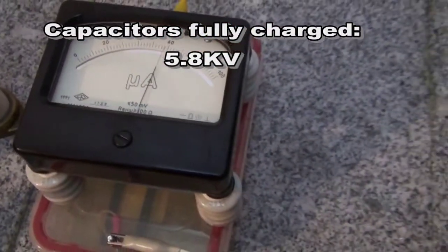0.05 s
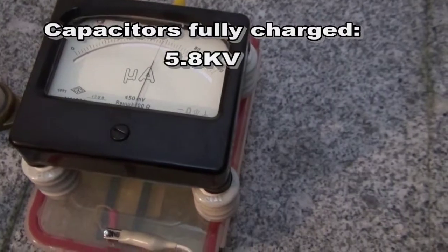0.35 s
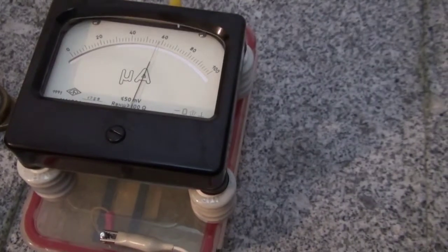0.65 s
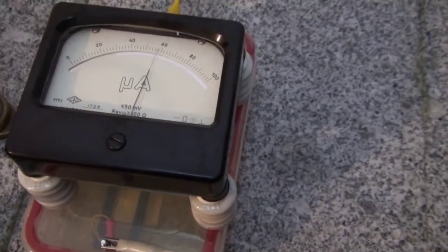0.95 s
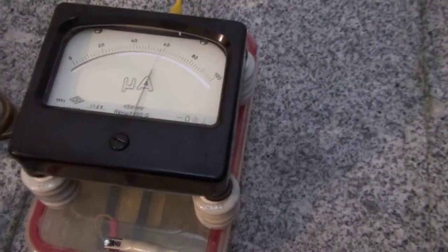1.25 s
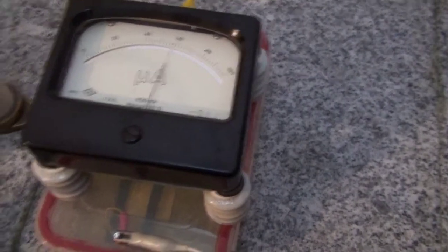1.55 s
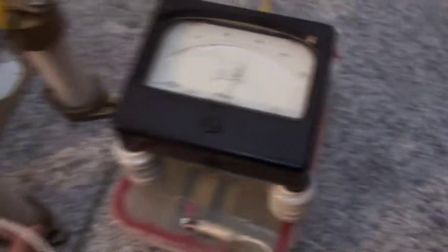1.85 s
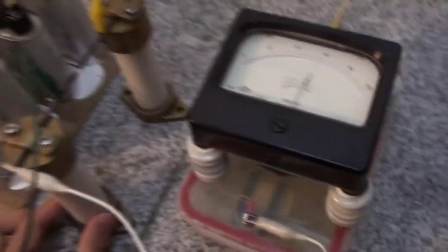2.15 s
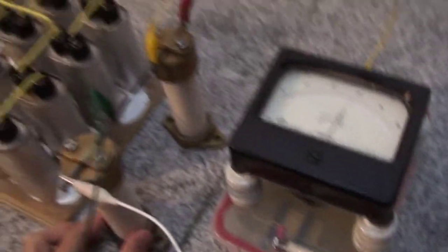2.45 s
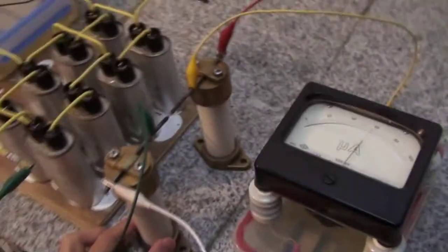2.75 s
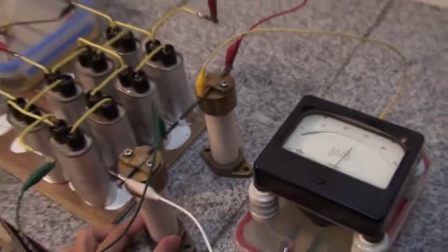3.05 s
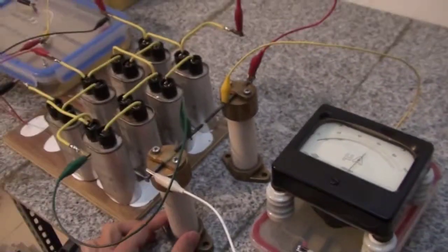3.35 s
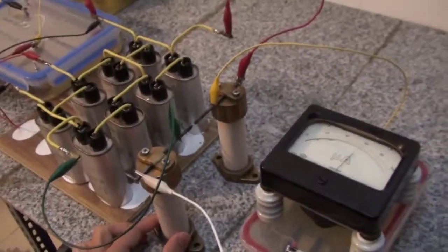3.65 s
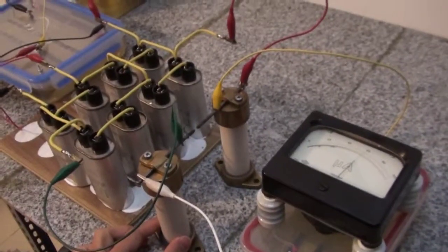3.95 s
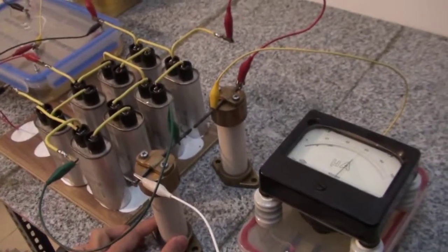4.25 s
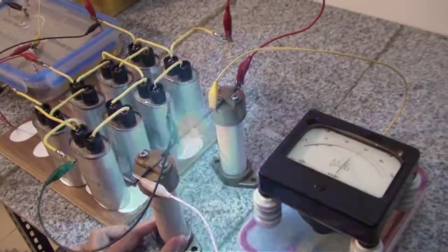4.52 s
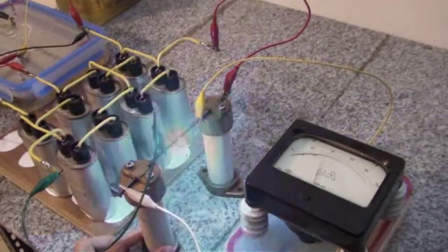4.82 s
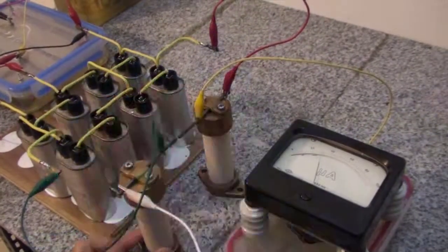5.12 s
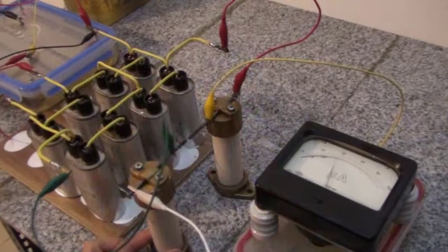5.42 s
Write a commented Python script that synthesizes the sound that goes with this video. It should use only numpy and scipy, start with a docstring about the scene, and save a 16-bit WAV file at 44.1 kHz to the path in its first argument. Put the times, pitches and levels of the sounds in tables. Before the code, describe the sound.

Faint room hiss and hum, then a rapid run of loud electric spark cracks merging into a bright sizzle.

```python
"""Bare, hard-floored room with a charged high-voltage capacitor bank. At first only hiss, rumble, hum
and one small handling tick. From 4.4 s a spark gap breaks down about 12 times a second. Each spark:
a sharp crack with the same floor and wall echoes, a short ring of the apparatus, a bright tail and a
microphone overload thump, heavy after a long pause. Gain control ducks the cracks and recovers into
the tails: an almost unbroken sizzle."""
import sys
import numpy as np
from scipy import signal
from scipy.fft import rfft, irfft
from scipy.io import wavfile
from scipy.ndimage import uniform_filter1d

SR = 44100
rng = np.random.default_rng(int(sys.argv[2]) if len(sys.argv) > 2 else 0)


def transcribe(u):
    """Save the signal u as a 16-bit wav file named by the first command-line argument.

    u: samples, shape (n,) or (channels, n), limited to [-1, 1]; the rate is SR.
    q: integer samples, one column per channel.
    """
    v = np.clip(np.atleast_2d(u).T, -1, 1)
    q = np.round(v * 32767).astype(np.int16)
    wavfile.write(sys.argv[1], SR, q)


N = 246078
TIME_S = np.arange(N) / SR
EVENT_N = SR // 2
EVENT_S = TIME_S[:EVENT_N]

# Room noise spectrum: f/Hz, relative density/dB
HISS_SPECTRUM = [(60, -1), (130, -1), (220, -3.5), (400, -3.5), (700, -6.5), (1200, -7.5), (2000, -12),
                 (4000, -18.5), (8000, -23.5), (13500, -27.5)]
# Room noise stereo image: f/Hz, L-R correlation
HISS_CORRELATION = [(60, .99), (200, 0.86), (400, 0.55), (800, 0.089), (3000, .12), (8000, 0.29),
                    (14000, 0.61)]
# Hum lines: f/Hz, rms level/dB
HUM_LINES = [(52.2, -54.5), (150.7, -76.5), (199.2, -73.5), (301.5, -76), (839.8, -79), (6700, -88.5),
             (8899, -90)]
# Handling tick: t/s, level/dB
TICKS = [(1.7128, -51)]
# Tick spectrum: f/Hz, relative density/dB
TICK_SPECTRUM = [(500, -22), (1900, 4), (4200, -15), (6300, 1), (9000, -16), (13000, -30)]
# Gap breakdowns: t/s, relative level/dB
DISCHARGES = [(4.4273, 4), (4.5245, 1.5), (4.617, 2), (4.7078, 1), (4.804, 1.5), (4.908, 0.5),
              (4.9968, -0.5), (5.0675, 1), (5.1475, -1), (5.272, 1.5), (5.354, -3.5), (5.4609, -2.5),
              (5.5443, 6)]
# Direct path and first reflections: delay/s, relative level/dB
ARRIVALS = [(0.0, -1), (.0025, 2.5), (.0046, -3), (.0067, 4), (0.0095, -7.5), (.0160, -10), (0.0252, -18.5)]
# Crack spectrum: f/Hz, relative density/dB
CRACK_SPECTRUM = [(60, -38), (200, -12.5), (600, 0), (930, -4.5), (1130, -9), (1800, -1), (3500, -5.5),
                  (7500, 2.5), (10300, 6.5), (12700, -3), (15500, -14)]
# Crack stereo image: f/Hz, L-R correlation
CRACK_CORRELATION = [(200, -0.65), (700, -0.4), (2000, 0.049), (6000, 0.88), (15000, 0.78)]
# Reverberation spectrum: f/Hz, relative density/dB
REVERB_SPECTRUM = [(59, -82), (100, -35), (234, -27.5), (608, -23.5), (891, -23), (1360, -15.5),
                   (2170, -13), (2860, -7.5), (3400, -7.5), (6990, 0.5), (10500, -1), (12700, -10),
                   (14700, -5.5), (16000, -10.5)]
# Stereo image of reverberation and tick: f/Hz, L-R correlation
ROOM_CORRELATION = [(200, 1), (3000, 0.88), (8000, 0.79), (15000, 0.35)]


def from_db(db):
    """Decibels to gain."""
    return 10 ** (np.asarray(db) / 20)


def unit_rms(x):
    """Scale to rms 1."""
    return x / np.sqrt(np.mean(x ** 2) + 1e-20)


def at_hz(points, hz):
    """Table lookup on a log-frequency axis."""
    table = np.array(points)
    return np.interp(np.log(np.maximum(hz, 1)), np.log(table[:, 0]), table[:, 1])


def butter(x, edge_hz, kind, order):
    """Causal Butterworth filter."""
    return signal.sosfilt(signal.butter(order, edge_hz, kind, fs=SR, output="sos"), x + 1e-18)


def drift(knots_per_s):
    """Slow wander between unit-variance random knots."""
    knots = rng.standard_normal(256)
    return np.interp(TIME_S * knots_per_s, np.arange(len(knots)), knots)


def stereo_noise(spectrum, correlation, size=EVENT_N):
    """Coloured noise, rms 1, L-R correlation set per frequency."""
    hz = np.arange(size // 2 + 1) * SR / size
    mid, side = rfft(rng.standard_normal((2, size)))
    rho = at_hz(correlation, hz)
    left_right = np.sqrt(1 + rho) * mid + np.sqrt(1 - rho) * side * [[1], [-1]]
    return unit_rms(irfft(left_right * from_db(at_hz(spectrum, hz)), size))


def decay(t60_s, delay_s=0):
    """Step at delay_s, then exponential decay."""
    age_s = EVENT_S - delay_s
    return (age_s >= 0) * from_db(-60 * np.maximum(age_s, 0) / t60_s)


def add(out, start_s, sound):
    """Mix in at start_s."""
    start = round(start_s * SR)
    part = sound[:, :max(N - start, 0)]
    out[:, start:start + part.shape[1]] += part


def hiss(start_db, rise_db_per_s):
    """Room noise, creeping up steadily."""
    gain = from_db(start_db + rise_db_per_s * TIME_S)
    return butter(gain * stereo_noise(HISS_SPECTRUM, HISS_CORRELATION, size=N), 13500, "low", order=12)


def rumble(level_db, wander_db, corner_hz):
    """Low background noise; the level wanders."""
    lows = butter(rng.standard_normal(N), corner_hz, "low", order=1)
    lows = butter(lows, 220, "low", order=2)
    return from_db(level_db + wander_db * drift(knots_per_s=3)) * unit_rms(lows)


def hum(waver_hz, waver_db):
    """Sine lines, each wavering in pitch and level."""
    out = np.zeros(N)
    for hz, rms_db in HUM_LINES:
        phase = 2 * np.pi * np.cumsum(hz + waver_hz * drift(knots_per_s=9.08)) / SR
        amplitude = np.sqrt(2) * from_db(rms_db + waver_db * drift(knots_per_s=13.0))
        out += amplitude * np.sin(phase)
    return out


def tick(t60_s):
    """Tiny, dry handling click."""
    out = np.zeros((2, N))
    for start_s, db in TICKS:
        add(out, start_s, from_db(db) * decay(t60_s) * stereo_noise(TICK_SPECTRUM, ROOM_CORRELATION))
    return out


def crack(t60_s):
    """Arc snap, direct and off the floor and nearby surfaces; arrivals add in power."""
    power = sum((from_db(db) * decay(t60_s, delay_s)) ** 2 for delay_s, db in ARRIVALS)
    return np.sqrt(power) * stereo_noise(CRACK_SPECTRUM, CRACK_CORRELATION)


def ring(hz, relative_db, t60_s):
    """Short, hollow resonance of the apparatus around the gap."""
    return from_db(relative_db) * decay(t60_s) * np.sin(2 * np.pi * hz * EVENT_S)


def thump(pause_s, t60_s, band_hz, grit, echo_db):
    """The pressure step overloads each microphone: ragged swing, kicked back by a strong echo."""
    usual_pause_s, usual_loss_db, recovery_s = 0.08, 35.5, 0.051
    loss_db = usual_loss_db * np.exp((usual_pause_s - pause_s) / recovery_s)  # long pause: full weight
    echo_s = ARRIVALS[3][0]
    kicks = decay(t60_s) - from_db(echo_db) * decay(t60_s, echo_s)
    ragged = kicks * (1 + grit * rng.standard_normal((2, EVENT_N)))
    low_hz, high_hz = band_hz
    dull = butter(ragged, high_hz, "low", order=2)
    return from_db(-loss_db) * butter(dull, low_hz, "high", order=1)


def reverberation(build_s=0.0045, near_db=8.0, near_t60_s=0.039, room_t60_s=0.5):
    """Diffuse tail: scatter from the nearby apparatus dies first, then the room."""
    swell = 1 - np.exp(-EVENT_S / build_s)
    fade = decay(room_t60_s) + from_db(near_db) * decay(near_t60_s)
    return swell * fade * stereo_noise(REVERB_SPECTRUM, ROOM_CORRELATION)


def blend(usual, fresh, fresh_share):
    """Equal-power mix of a repeated sound and a fresh one."""
    return np.sqrt(1 - fresh_share) * usual + np.sqrt(fresh_share) * fresh


def sparks(crack_db, reverb_db, thump_db):
    """Near-identical sparks: same crack and tail each time, crack partly and tail slightly varied."""
    out = np.zeros((2, N))
    draws = [(crack(t60_s=0.015), reverberation()) for _ in range(len(DISCHARGES) + 1)]
    usual_crack, usual_tail = draws[0]
    apparatus = ring(hz=923, relative_db=-14, t60_s=0.015)
    pauses_s = np.diff([start_s for start_s, _ in DISCHARGES], prepend=0)
    for (start_s, spark_db), pause_s, (new_crack, new_tail) in zip(DISCHARGES, pauses_s, draws[1:]):
        snap = from_db(crack_db) * (blend(usual_crack, new_crack, fresh_share=0.41) + apparatus)
        tail = from_db(reverb_db) * blend(usual_tail, new_tail, fresh_share=0.095)
        swing = thump(pause_s, t60_s=0.017, band_hz=(35.4, 1440), grit=4.1, echo_db=-5.0)
        add(out, start_s, from_db(spark_db) * (snap + tail) + from_db(thump_db) * swing)
    return out


def peak_hold(db, fall_db_per_s):
    """Instant rise, steady fall."""
    fall_db = fall_db_per_s * TIME_S
    return np.maximum.accumulate(db + fall_db) - fall_db


def gain_control(x, threshold_db, duck_db_per_db, fast_range_db, smooth_s):
    """Ducks on loud sound; part of the gain returns fast as the room dies away, the rest slowly."""
    power = uniform_filter1d(np.mean(x ** 2, axis=0), size=132)  # 3 ms
    over_db = np.maximum(10 * np.log10(np.maximum(power, 1e-12)) - threshold_db, 0)
    fast_db = peak_hold(over_db, fall_db_per_s=1600)
    slow_db = peak_hold(over_db, fall_db_per_s=7.0) - fast_range_db
    pole = np.exp(-1 / (smooth_s * SR))
    held_db = signal.lfilter([1 - pole], [1, -pole], np.maximum(fast_db, slow_db))
    return x * from_db(-duck_db_per_db * held_db)


def scene():
    """Quiet room, one tick, then the sparks."""
    room = hiss(start_db=-60.5, rise_db_per_s=0.77)
    room += rumble(level_db=-66, wander_db=1, corner_hz=35.4)
    room += hum(waver_hz=1.0, waver_db=0.7)
    discharges = sparks(crack_db=23.5, reverb_db=11.0, thump_db=23)
    return room + tick(t60_s=0.021) + discharges


def record(dry):
    """Gain control, soft clip, steep low-pass."""
    ceiling, cutoff_hz = 0.8, 15900
    levelled = gain_control(dry, threshold_db=-23.5, duck_db_per_db=0.81,
                            fast_range_db=21.5, smooth_s=0.0007)
    clipped = ceiling * np.tanh(levelled / ceiling)
    return signal.sosfilt(signal.ellip(10, 0.2, 80, cutoff_hz, fs=SR, output="sos"), clipped)


dry = scene()
out = record(dry)
transcribe(out)
```